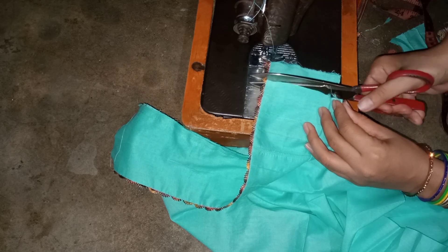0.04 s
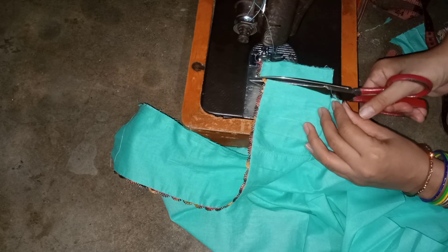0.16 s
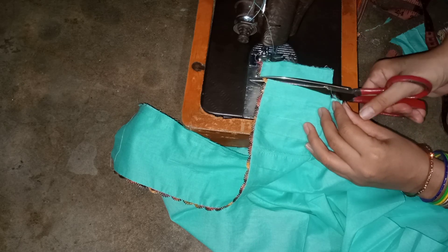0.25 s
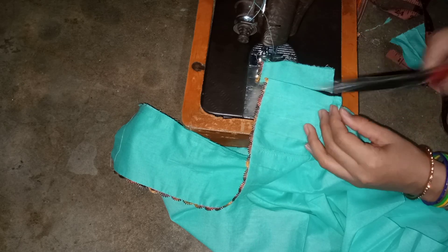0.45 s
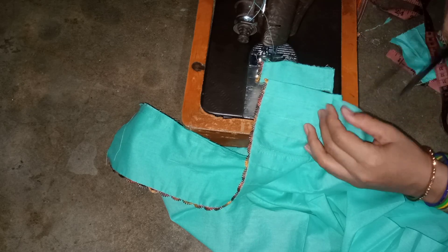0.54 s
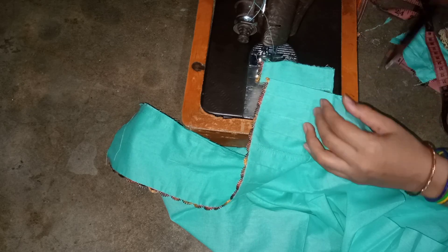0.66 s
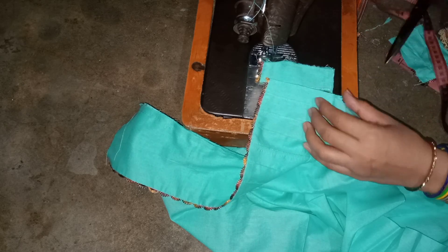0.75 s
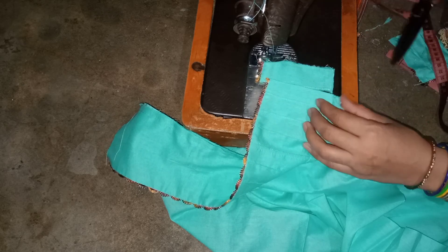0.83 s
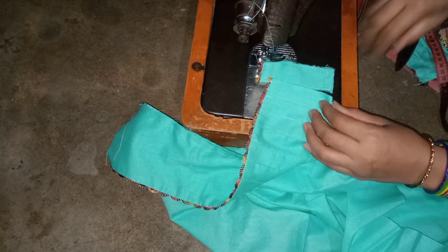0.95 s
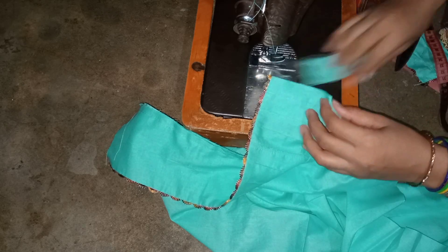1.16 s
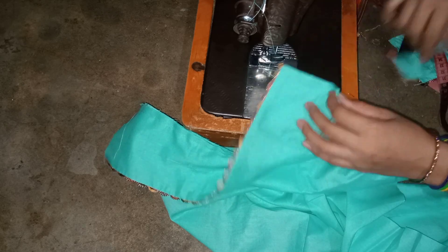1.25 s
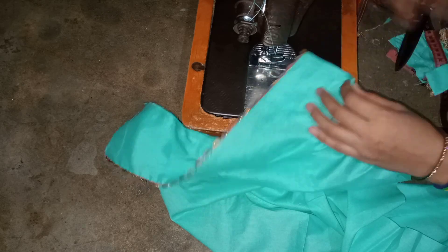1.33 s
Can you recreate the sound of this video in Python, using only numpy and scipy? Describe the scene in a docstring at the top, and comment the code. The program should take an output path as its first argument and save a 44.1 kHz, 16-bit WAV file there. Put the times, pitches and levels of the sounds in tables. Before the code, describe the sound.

One quick scissor cut shears the last threads of fabric, a dull table ring beneath it; half a second later the scissors clack onto wood, tiny clicks and a bangle tink follow, over indoor hum.

```python
"""A bare hard room, recorded close: patchy filtered noise for its low rumble, with a wavering mains hum in it.
Far off something ticks evenly: a short rattle heard by way of the walls, with a dry ping of dying partials.
Near the microphone, steel scissors slide and shear the last threads of a cloth, as runs of random jolts
through ringing steel; they snap shut, and the table answers with a dull swelling ring.
Then a clack down on wood with a ringing handle, faint tiny clicks around it, and the metal tink of a bangle."""
import sys
import numpy as np
from scipy import signal
from scipy.io import wavfile
from scipy.ndimage import uniform_filter1d

SR = 44100
rng = np.random.default_rng(int(sys.argv[2]) if len(sys.argv) > 2 else 0)


def convert_level_to_amplitude(level_db):
    """Map a level in decibels to its linear amplitude factor."""
    exponent = np.asarray(level_db, float) / 20
    return 10 ** exponent


def dump_mix(stems):
    """Bounce the given channels to the path in sys.argv[1] as a 16-bit WAV at rate SR."""
    frames = np.atleast_2d(stems).T  # one column per channel
    limited = np.clip(frames, -1, 1)  # hard clip at full scale
    pcm = np.round(limited * 32767).astype(np.int16)
    wavfile.write(sys.argv[1], SR, pcm)


N = 61739  # length in samples, 1.4 s


def evened(x):
    """Scales to rms 1."""
    return x / np.sqrt(np.mean(x ** 2) + 1e-20)


def read(points, hz):
    """Reads a table on a log-frequency axis."""
    f, value = np.transpose(points)
    return np.interp(np.log(hz + 1), np.log(f + 1), value)


def along(points):
    """Reads a level table over time as gain, silent before its first point."""
    s, db = np.transpose(points)
    return convert_level_to_amplitude(np.interp(np.arange(N) / SR, s, db, left=-120, right=db[-1]))


def add(mix, s, sound):
    """Mixes a sound in at a time in seconds."""
    part = mix[round(s * SR):][:len(sound)]
    part += sound[:len(part)]


def wander(width):
    """Slow random curve of rms 1: noise averaged twice over width samples."""
    return evened(uniform_filter1d(uniform_filter1d(rng.standard_normal(N), width), width))


def crack(points):
    """Causal click with the given spectrum, as a minimum-phase response of peak 1."""
    db = np.maximum(read(points, abs(np.fft.fftfreq(4096, 1 / SR))), -80)
    log_gain = db * np.log(10) / 20
    phase = -signal.hilbert(log_gain).imag
    click = np.fft.ifft(np.exp(log_gain + 1j * phase)).real[:2048]
    return click / abs(click).max()


def ring(modes):
    """Dying partials of a struck object, each with its own decay, peak 1."""
    t = np.arange(SR // 4) / SR
    x = np.zeros(len(t))
    for hz, db, t60 in modes:
        x += convert_level_to_amplitude(db - 60 * t / t60) * np.sin(2 * np.pi * hz * t + rng.uniform(0, 2.7))
    x *= np.minimum(t / 0.00054, 1)  # the blow takes half a millisecond
    return x / abs(x).max()


def blend(ringing, bare, ring_db):
    """A crack plus a ring at ring_db relative to it in energy, total energy 1."""
    body = convert_level_to_amplitude(ring_db) * ringing / np.linalg.norm(ringing)
    body[:len(bare)] += bare / np.linalg.norm(bare)
    return body / np.linalg.norm(body)


def rattle(body, decay_s, chatter):
    """One hard jolt and a few ms of dying chatter through a body, peak 1."""
    burst = chatter * rng.standard_normal(800) * np.exp(-np.arange(800) / SR / decay_s)
    burst[0] = -1.7
    x = signal.fftconvolve(burst, body)
    return x / abs(x).max()


def slips(per_s, curve):
    """A random run of small jolts whose strength follows a curve and then stops."""
    spread_db = 4
    size = convert_level_to_amplitude(spread_db * np.minimum(rng.exponential(1, N), 5)) * rng.choice([-1., 1.], N)
    jolts = evened(size * (rng.random(N) < per_s / SR))
    stop = (curve[-1][0] + .02, -120)
    return jolts * along(curve + [stop])


# Colour of the room's low rumble, relative: pitch_hz, level_db [dB per Hz]
RUMBLE_COLOUR = [(20, -50), (50, -17), (97, -1), (220, -5.5), (340, 0.5), (530, -12.5), (780, -9.5),
                 (950, -17), (1250, -11.5), (1520, -21), (1900, -19.5), (2500, -30.5), (4500, -38),
                 (6000, -35.5), (8500, -46.5), (12000, -56), (16000, -57)]
# Slow drift of the rumble about its set level: start_s, level_db
RUMBLE_DRIFT = [(0, -2.5), (.15, 0.5), (.5, -1), (1.4, 0.5)]


def rumble():
    """Room rumble and hiss: noise coloured band by band, patchy in time and frequency."""
    level_db, patch_db = -39, 2.0
    frames, hz = N // 256 + 5, np.fft.rfftfreq(1024, 1 / SR)
    a, b, patches = rng.standard_normal((frames, 513, 3)).T
    patches = evened(uniform_filter1d(uniform_filter1d(patches, 10, axis=0), 8, axis=1))
    z = (a + 1j * b) * convert_level_to_amplitude(read(RUMBLE_COLOUR, hz)[:, None] + patch_db * patches)
    noise = signal.istft(z, nperseg=1024, noverlap=768)[1][:N]
    return convert_level_to_amplitude(level_db) * along(RUMBLE_DRIFT) * evened(noise)


# Strength of the mains hum, rms before its waver: start_s, level_db
HUM_LEVEL = [(0, -84), (.2, -44), (.3, -54), (.6, -45), (1.15, -42.5), (1.4, -43)]


def hum():
    """Mains hum: one sine whose pitch and level waver at random."""
    pitch_hz, wander_hz, waver_db = 100, 4, 2.5  # wander and waver are rms
    turns = np.cumsum(pitch_hz + wander_hz * wander(1500)) / SR
    waver = convert_level_to_amplitude(waver_db * wander(500))
    return np.sqrt(2) * waver * along(HUM_LEVEL) * np.sin(2 * np.pi * turns)


# The far ticks, level before the offsets of click and ping: start_s, level_db
TICKS = [(0.1002, -32.5), (0.632, -32), (1.1588, -39.5)]
# Partials of the ticker, relative: pitch_hz, level_db, t60_s
TICKER = [(1920, 6.5, .06), (4710, 10.5, 0.044), (6100, -2, 0.034), (7900, -19.5, .05), (11340, -10, 0.16),
          (14850, -33, .05)]
# Colour of the tick's bare crack, relative: pitch_hz, level_db [dB per Hz]
TICK_COLOUR = [(1200, -52.5), (2000, -3), (3500, -8.5), (5000, -2.5), (6500, 1.5), (8300, -8.5),
               (9500, -14), (16000, -54)]


def tick_clicks():
    """The click of each far tick, a rattled crack and ring; it is heard only by way of the walls."""
    offset_db, decay_s, chatter = 9.5, 0.0054, .12
    out, body = np.zeros(N), blend(ring(TICKER), crack(TICK_COLOUR), -16)
    for s, db in TICKS:
        add(out, s, convert_level_to_amplitude(db + offset_db) * rattle(body, decay_s, chatter))
    return out


def tick_pings():
    """The faint dry ping of each tick: the ticker's partials with a softened start."""
    offset_db, rise_s = -3, .003
    out = np.zeros(N)
    for s, db in TICKS:
        ping = ring(TICKER)
        rise = np.minimum(np.arange(len(ping)) / SR / rise_s, 1)
        add(out, s, convert_level_to_amplitude(db + offset_db) * ping * rise)
    return out


# Decay of the echoes, before bench and wall shaping: pitch_hz, t60_s
ROOM_DECAY = [(200, 0.27), (1000, 0.36), (4000, .4), (8000, .36), (15000, 0.23)]


def room(x):
    """Quick echoes off the bench, then wall echoes that gather after a gap and die band by band."""
    gap_s, rise_s, bench_s, bench_share = 0.01, 0.027, 0.012, 1.085
    taps = np.zeros(SR)
    at = np.arange(0, SR - 12, 12) + rng.integers(0, 12, (SR - 1) // 12)  # one echo in every 12 samples
    taps[at] = rng.choice([-1., 1.], len(at))
    hz, t, z = signal.stft(taps, SR, nperseg=256)
    decay = convert_level_to_amplitude(-60 * t / read(ROOM_DECAY, hz)[:, None])
    tail = signal.istft(z * decay, SR, nperseg=256)[1][:SR]
    t = np.arange(len(tail)) / SR
    walls = np.clip((t - gap_s) / rise_s, 0, 1)
    bench = bench_share * np.exp(-t / bench_s)
    tail = tail * (walls + bench)
    return signal.fftconvolve(x, tail / np.linalg.norm(tail))[:N]


# Ringing of the steel blades, relative: pitch_hz, level_db, t60_s
BLADES = [(1020, 0, .04), (1850, 2, .08), (2220, 1, .035), (3300, -3, .016), (4700, -9, .006),
          (5650, -1, .01), (6600, -7, .005), (7800, -9, .01), (9900, -14, .008), (15150, -19, .012)]
# Colour of a bare crack of the cut, relative: pitch_hz, level_db [dB per Hz]
CRUNCH = [(100, -25), (330, -0.5), (850, -7), (1160, 0), (1600, -10), (2240, -2), (2700, -9), (5600, 0.5),
          (7300, -2), (9000, -7.5), (11500, -15.5), (13500, -17.5), (16000, -24)]


def blade_bodies():
    """What a jolt sounds like through the steel: mostly ring when sliding, mostly crack when cutting."""
    bare, steel = crack(CRUNCH), ring(BLADES)
    return blend(steel, bare, 14), blend(steel, bare, -21.5)


# The blades slide along each other before they bite: start_s, level_db
SLIDE = [(0.138, -55), (.157, -29), (.17, -42), (.182, -44.5), (.195, -35), (.21, -52), (0.231, -52)]


def blade_slide(sliding_body):
    """Blades slide and sing: dense small slips excite the steel."""
    return signal.fftconvolve(slips(9000, SLIDE), sliding_body)[:N]  # slips per second


# Pressure of blade on blade and cloth, before the level of the cut: start_s, level_db
CUT = [(0.228, -49), (0.24, -20), (0.25, -11.5), (0.272, -30.5), (0.308, -22.5), (0.37, -50)]


def thread_cut(cutting_body):
    """Threads part in a dense run of cracks that follows the pressure of the blades."""
    level_db, fibres_per_s = -6, 6000
    return convert_level_to_amplitude(level_db) * signal.fftconvolve(slips(fibres_per_s, CUT), cutting_body)[:N]


# Hardest snaps as the blades shut, dry peak: start_s, level_db
SNAPS = [(0.2383, -17.5), (0.2435, -7), (.2500, -2.5), (0.2641, -8), (0.2841, -9), (0.3065, -7.5)]


def blade_snaps(cutting_body):
    """A few hard snaps stand out of the cut, each a jolt with chatter."""
    decay_s, chatter = 0.0036, .4
    out = np.zeros(N)
    for s, db in SNAPS:
        add(out, s, convert_level_to_amplitude(db) * rattle(cutting_body, decay_s, chatter))
    return out


# Partials of the wooden table, relative: pitch_hz, level_db, t60_s
TABLE_MODES = [(180.7, -6.5, 0.62), (335, 2, 0.086), (473, 4.5, 0.043), (597, 6.5, 0.032), (840, -0.5, .03),
               (1155, 0.5, 0.054)]


def table_thud():
    """The table answers the snap with a dull ring, driven by a noise push that swells and fades."""
    start_s, level_db, rise_s = .24, -38, .025
    out, t = np.zeros(N), np.arange(SR // 10) / SR
    push = rng.standard_normal(len(t)) * t / rise_s * np.exp(-t / rise_s)
    add(out, start_s, convert_level_to_amplitude(level_db) * evened(signal.fftconvolve(push, ring(TABLE_MODES))))
    return out


# Faint tiny clicks of the hands, around the clack: start_s, level_db, pitch_hz
SPECKS = [(0.775, -59, 11600), (.975, -35, 8500), (1.001, -41, 14000), (1.019, -56, 13000)]


def hand_clicks():
    """Tiny clicks of the hands: each a sine inside a bell-shaped pulse."""
    out, t = np.zeros(N), np.arange(60) / SR
    for s, db, hz in SPECKS:
        pulse = np.exp(-((t - .0003) / 0.00016) ** 2)
        add(out, s, convert_level_to_amplitude(db) * np.sin(2 * np.pi * hz * t) * pulse)
    return out


CLACK_START_S = .8209
# Colour of scissors on wood, relative: pitch_hz, level_db [dB per Hz]
CLACK_COLOUR = [(500, -25), (1000, -16.5), (2000, -13), (3600, -13), (5300, -3.5), (6800, -6.5),
                (9200, -12.5), (11500, -25.5), (13000, -20), (16000, -47.5)]


def clack():
    """The scissors clack down on wood: one jolt and a short chatter through a bare crack."""
    level_db, decay_s, chatter = -4, .002, .1
    out = np.zeros(N)
    add(out, CLACK_START_S, convert_level_to_amplitude(level_db) * rattle(crack(CLACK_COLOUR), decay_s, chatter))
    return out


# Partials of the dropped handle, relative: pitch_hz, level_db, t60_s
HANDLE = [(4323, 0, .06), (5416, -8, .025), (6665, -1, .035), (9119, -14, .018)]


def handle_ring():
    """The dropped handle rings faintly and close as the scissors land."""
    out = np.zeros(N)
    add(out, CLACK_START_S, convert_level_to_amplitude(-16) * ring(HANDLE))
    return out


# Partials of a bangle, relative, before the wrist damps them: pitch_hz, level_db, t60_s
BANGLE = [(6950, 2, 0.095), (7700, -1, 0.37), (10500, -14, .12), (11140, -14, 0.12), (12700, -10, 0.087)]


def bangle_tink():
    """A bangle tinks close by and is soon damped by the wrist."""
    start_s, level_db, held_s = 1.119, -42.5, 0.047
    out, bangle = np.zeros(N), ring(BANGLE)
    damping = np.exp(-(np.arange(len(bangle)) / SR / held_s) ** 4)
    add(out, start_s, convert_level_to_amplitude(level_db) * bangle * damping)
    return out


# Microphone capsule, treble peak and roll-off: pitch_hz, level_db
CAPSULE = [(13600, 0), (14400, 10.5), (15200, 20.5), (15550, 7), (15750, -48)]


def capsule(z, hz):
    """Colours a spectrogram with the frequency response of the microphone capsule."""
    return z * convert_level_to_amplitude(read(CAPSULE, hz))[:, None]


# Gain when the suppressor is all but fully shut: pitch_hz, level_db
SUPPRESSOR_DEPTH = [(700, -1), (1500, -8.5), (5000, 1), (9000, -5), (15000, -14)]


def suppressor(z, hz):
    """Lowers the bands around 1500 Hz and the highest treble, in two steps, as the treble falls quiet."""
    knee_db = .6
    treble = (abs(z[hz > 3000]) ** 2).sum(0)
    db = 10 * np.log10(uniform_filter1d(treble, size=11) + 1e-20)
    over = db - np.percentile(db, 15)  # above the quiet level of the treble
    shut = 0
    for share, step_db in ((1, 18), (0.49, 9)):
        shut = shut + share / (1.5 + np.exp(np.clip((over - step_db) / knee_db, -30, 30)))
    return z * convert_level_to_amplitude(read(SUPPRESSOR_DEPTH, hz)[:, None] * shut)


def scene():
    """Near sounds with some room, the far tick by way of the walls, dry rings, and the background."""
    sliding_body, cutting_body = blade_bodies()
    scissors = blade_slide(sliding_body) + thread_cut(cutting_body) + blade_snaps(cutting_body)
    near = scissors + hand_clicks() + clack()
    wet = room(convert_level_to_amplitude(-0.5) * near + tick_clicks())
    rings = tick_pings() + handle_ring() + bangle_tink()
    background = rumble() + hum()
    return (near + rings + table_thud() + wet + background)[None]


def band_limit(x):
    """A steep low-pass at the top of the band."""
    return signal.sosfilt(signal.butter(12, 16660, fs=SR, output="sos"), x)


def record(dry):
    """The microphone capsule, then its suppressor, both worked on a spectrogram."""
    hz, _, z = signal.stft(dry[0], SR, nperseg=512, noverlap=384)
    z = suppressor(capsule(z, hz), hz)
    finished = signal.istft(z, SR, nperseg=512, noverlap=384)[1][None, :N]
    return band_limit(finished)


dry = scene()
out = record(dry)
dump_mix(out)
```